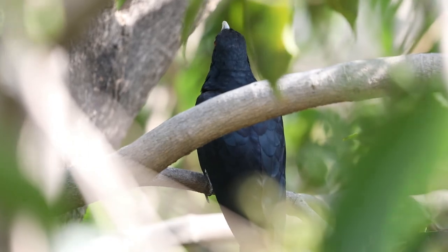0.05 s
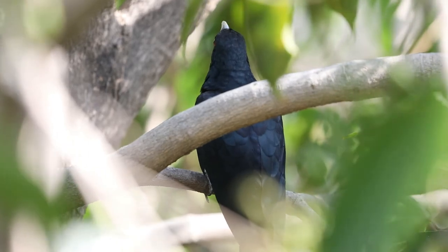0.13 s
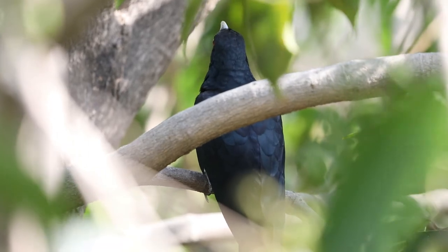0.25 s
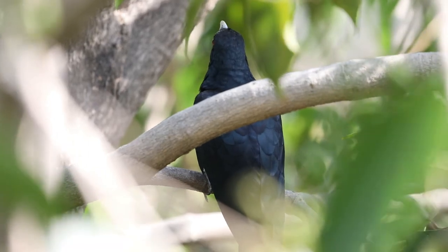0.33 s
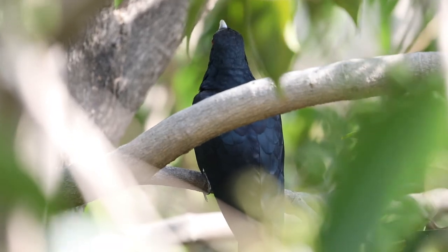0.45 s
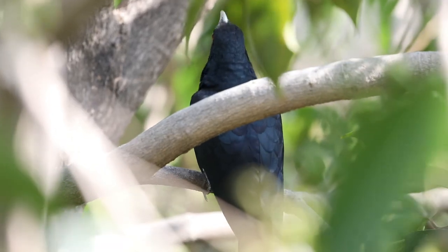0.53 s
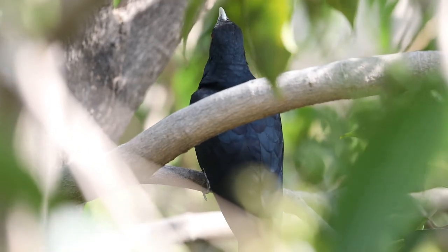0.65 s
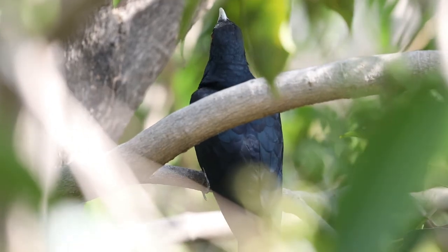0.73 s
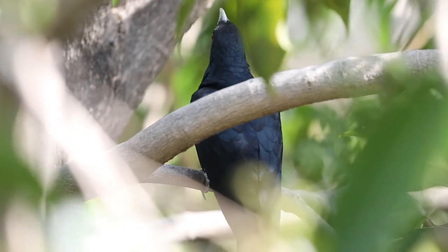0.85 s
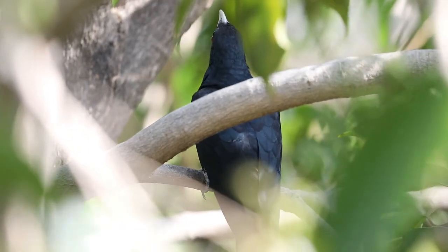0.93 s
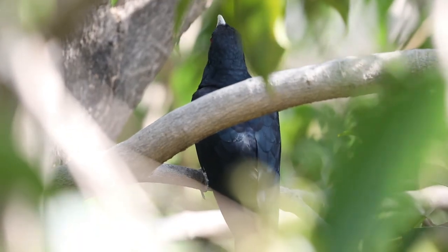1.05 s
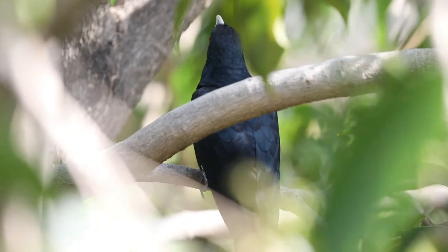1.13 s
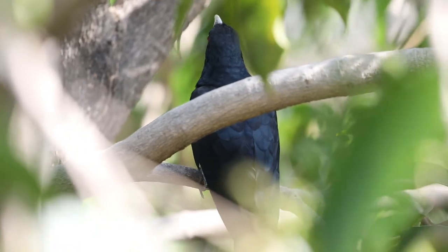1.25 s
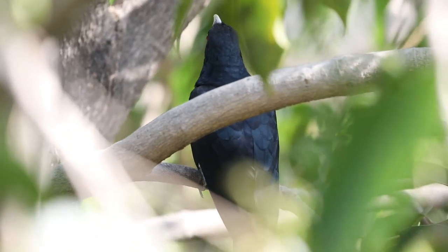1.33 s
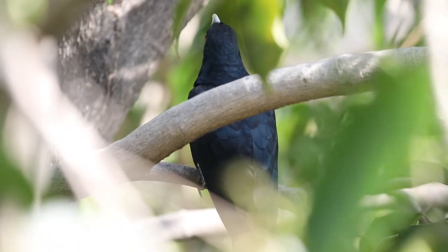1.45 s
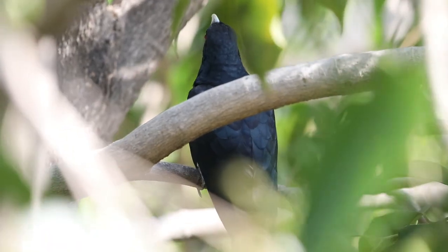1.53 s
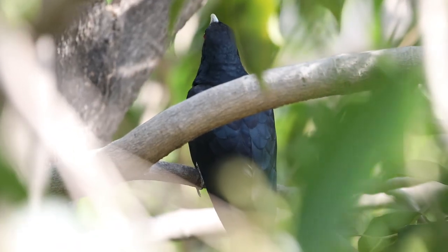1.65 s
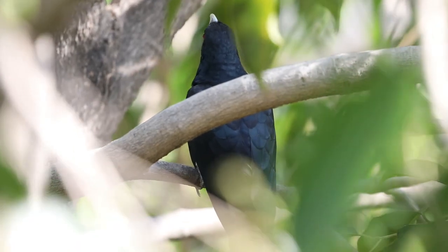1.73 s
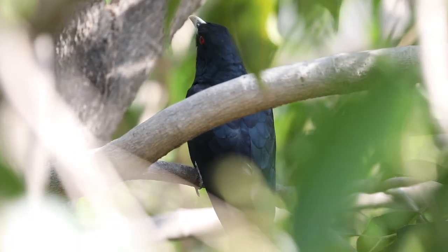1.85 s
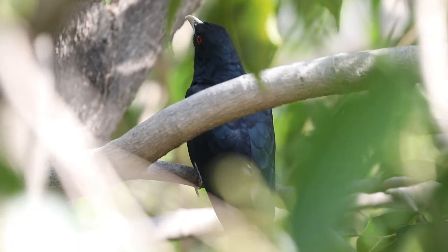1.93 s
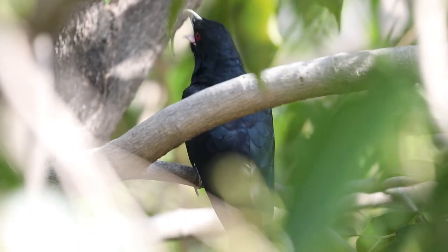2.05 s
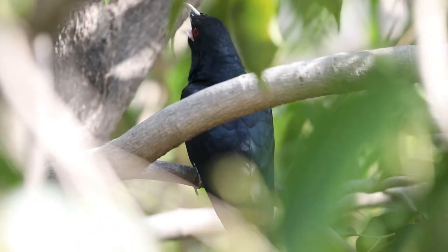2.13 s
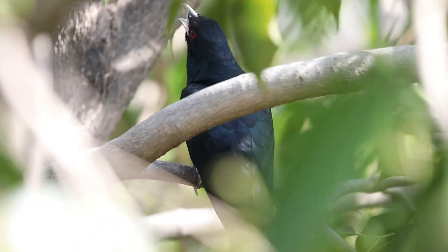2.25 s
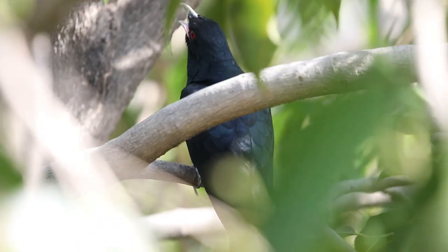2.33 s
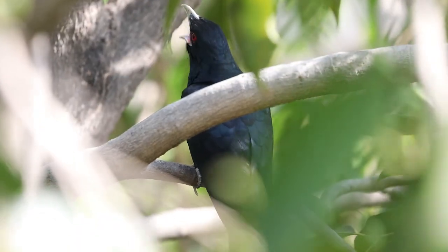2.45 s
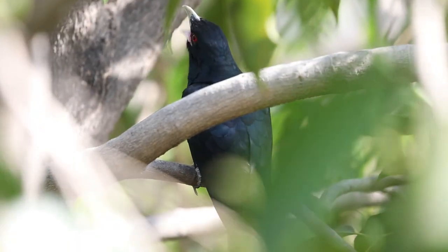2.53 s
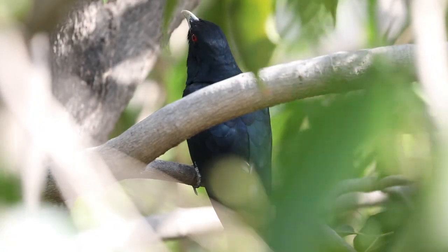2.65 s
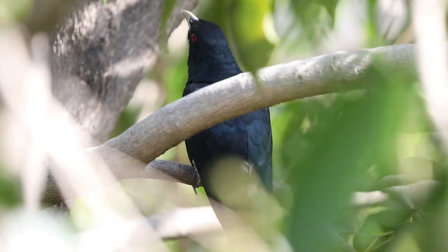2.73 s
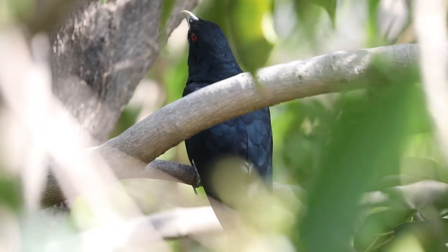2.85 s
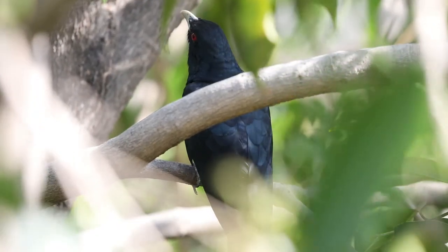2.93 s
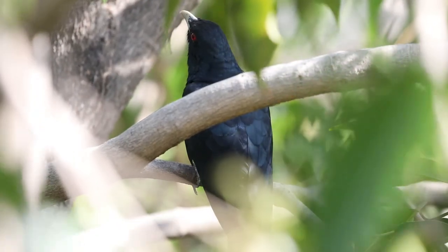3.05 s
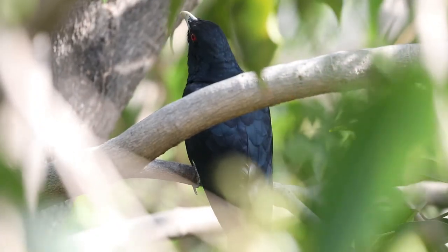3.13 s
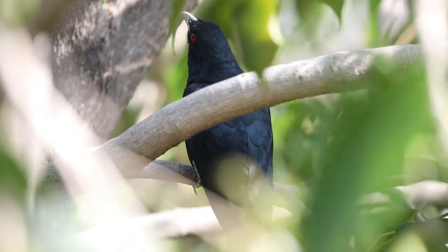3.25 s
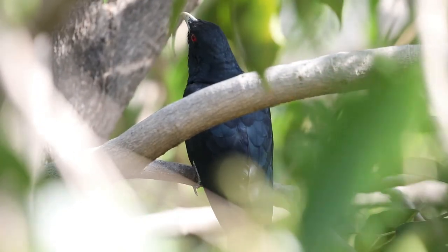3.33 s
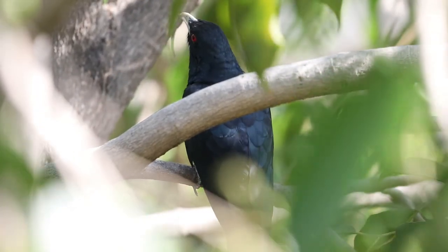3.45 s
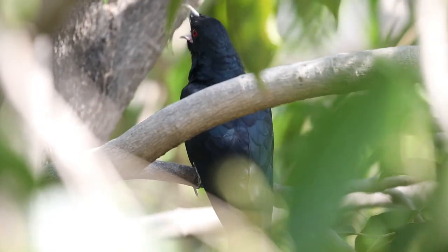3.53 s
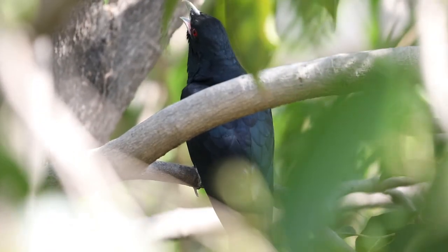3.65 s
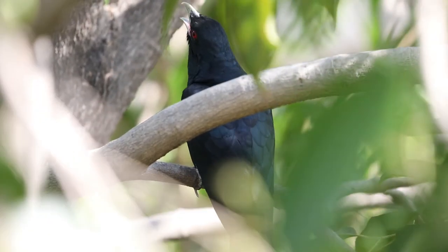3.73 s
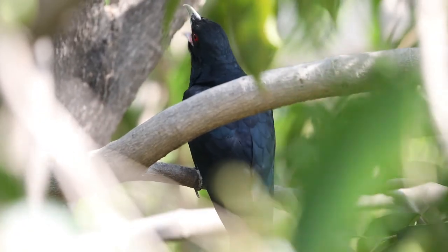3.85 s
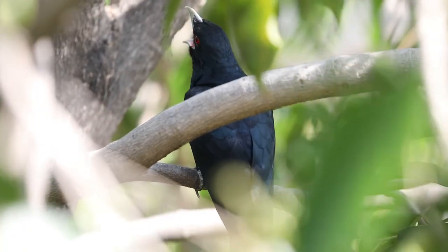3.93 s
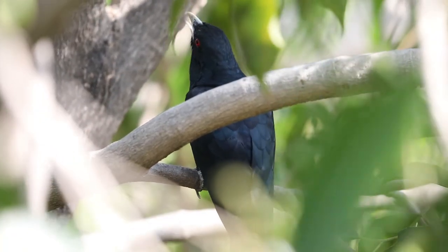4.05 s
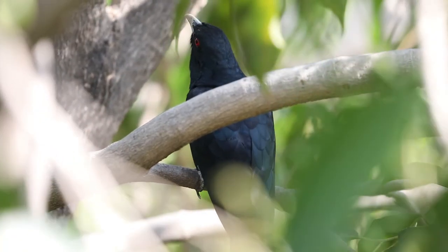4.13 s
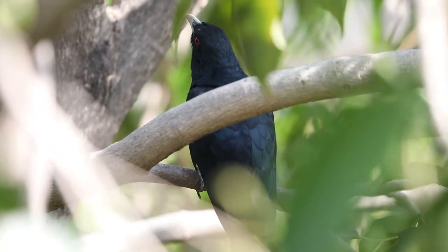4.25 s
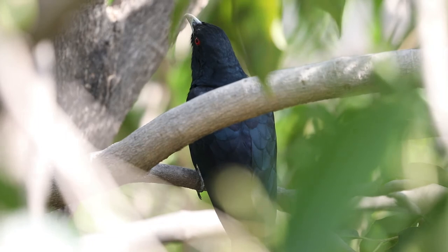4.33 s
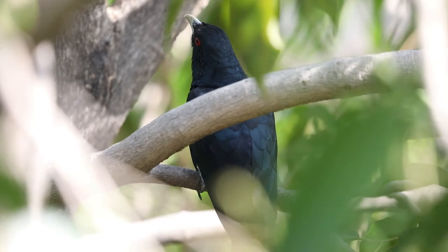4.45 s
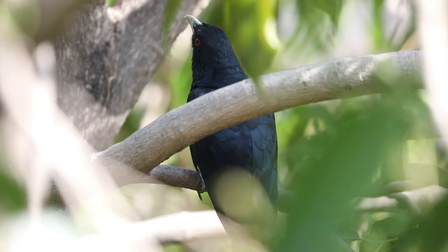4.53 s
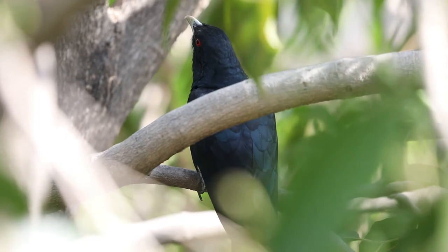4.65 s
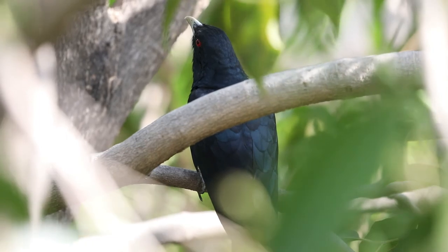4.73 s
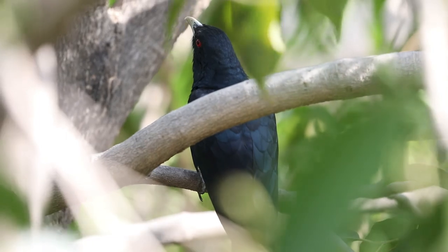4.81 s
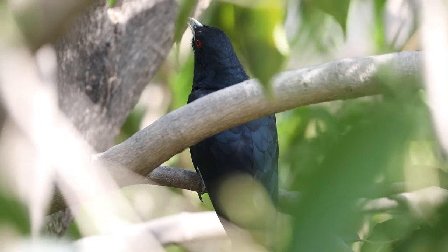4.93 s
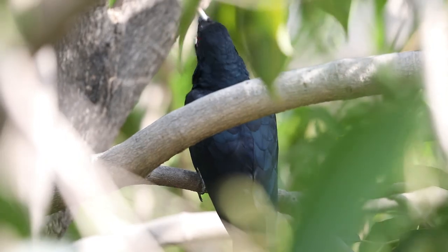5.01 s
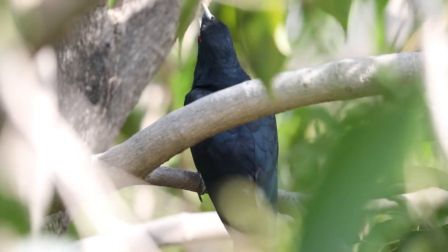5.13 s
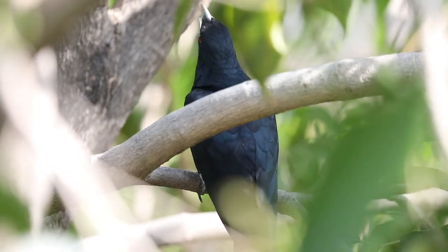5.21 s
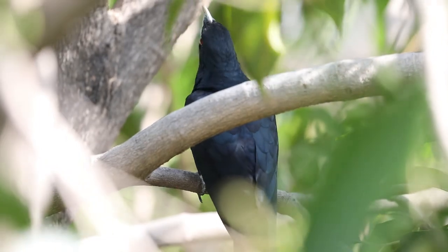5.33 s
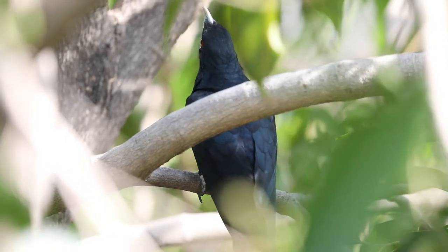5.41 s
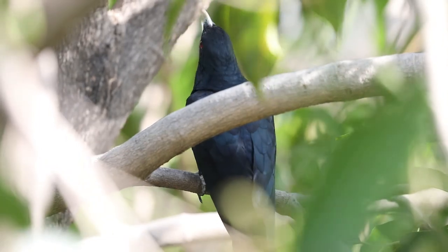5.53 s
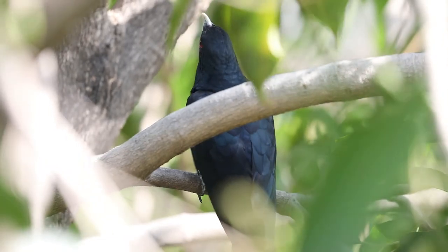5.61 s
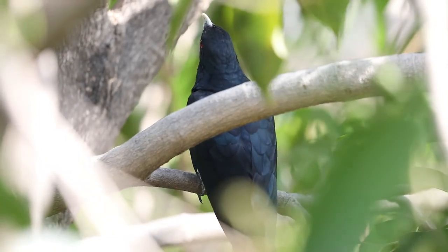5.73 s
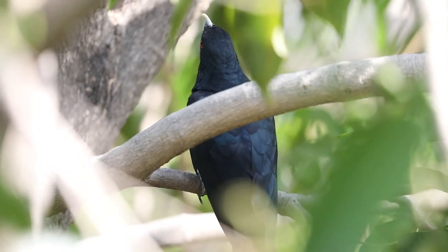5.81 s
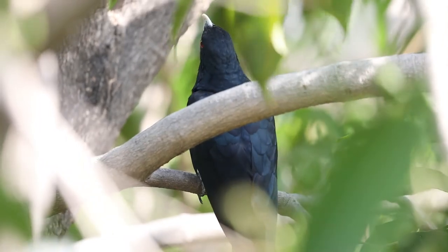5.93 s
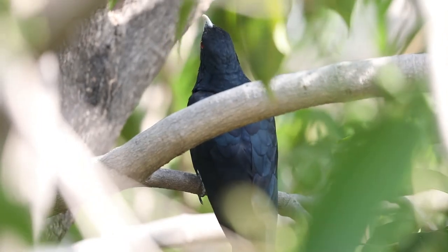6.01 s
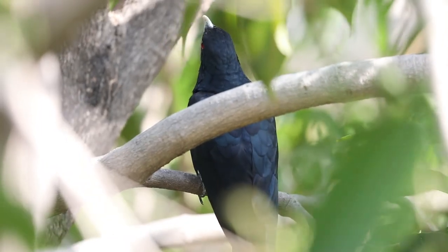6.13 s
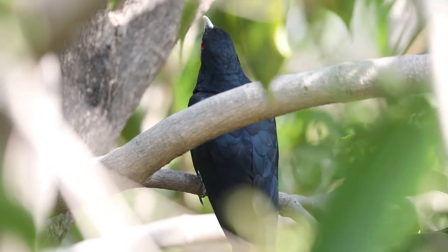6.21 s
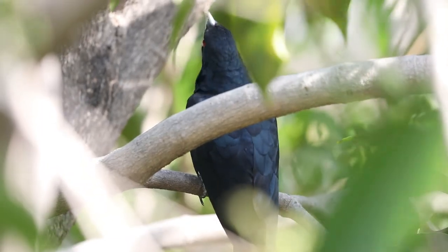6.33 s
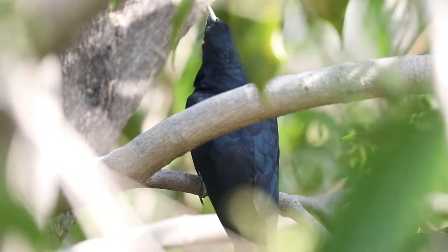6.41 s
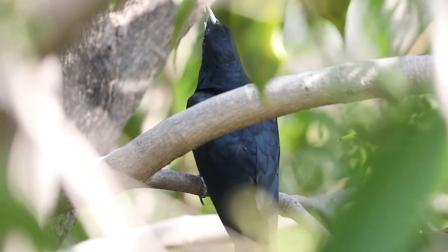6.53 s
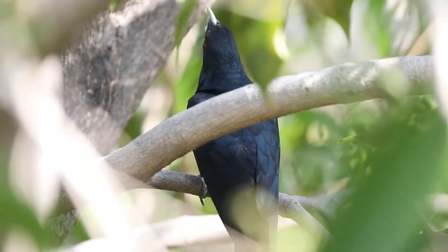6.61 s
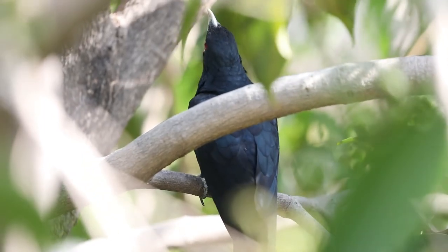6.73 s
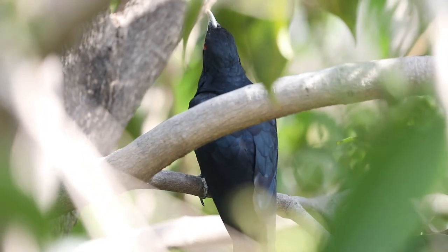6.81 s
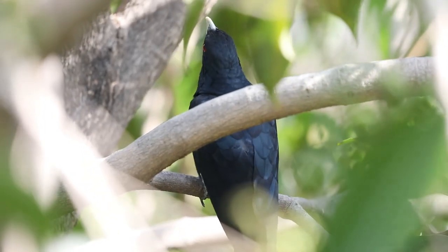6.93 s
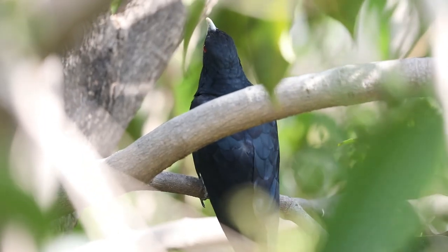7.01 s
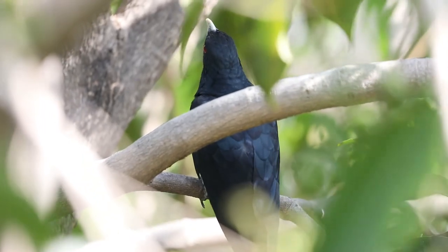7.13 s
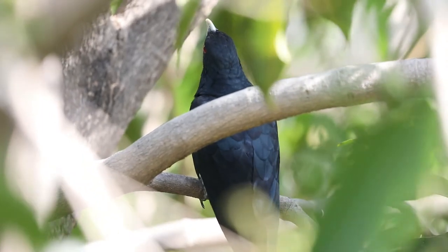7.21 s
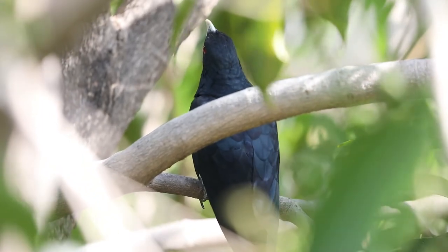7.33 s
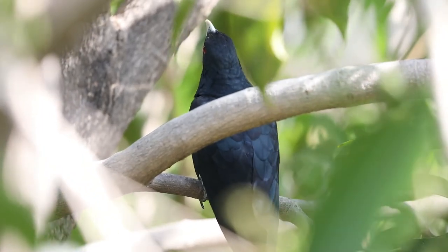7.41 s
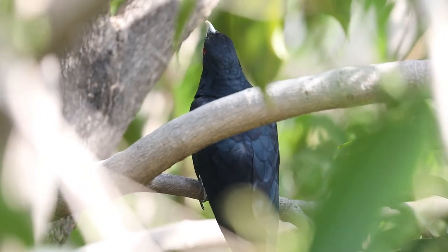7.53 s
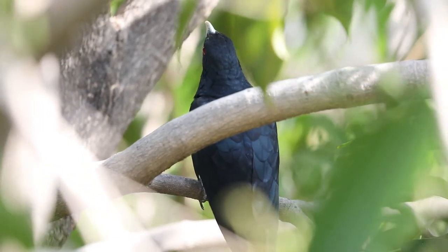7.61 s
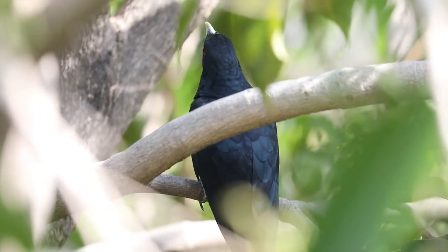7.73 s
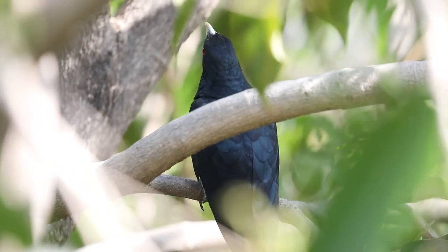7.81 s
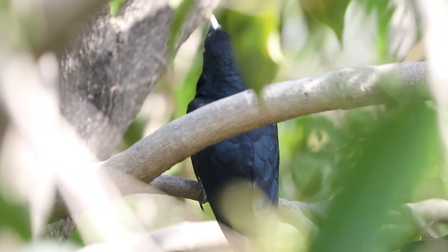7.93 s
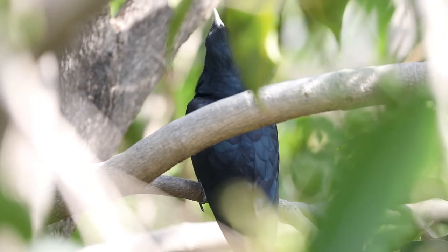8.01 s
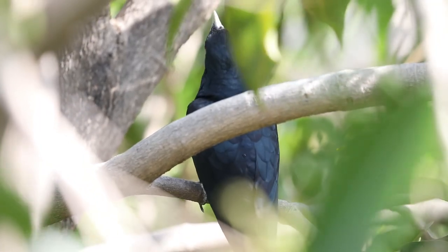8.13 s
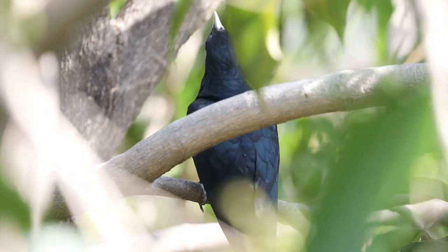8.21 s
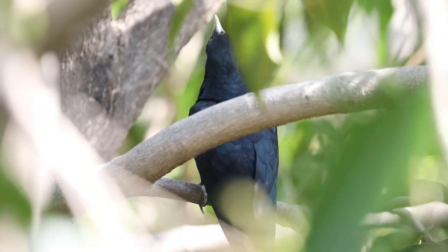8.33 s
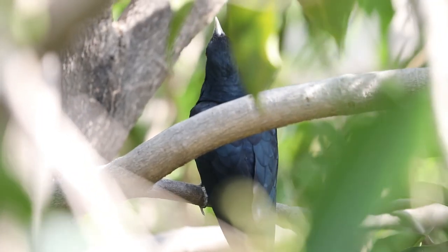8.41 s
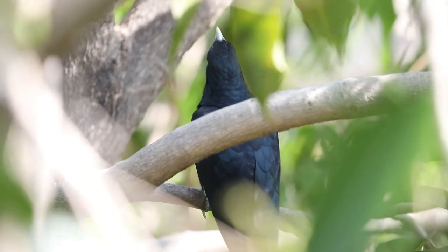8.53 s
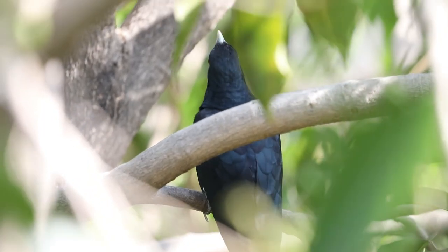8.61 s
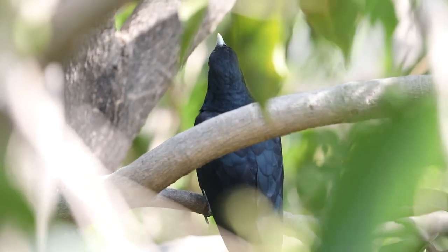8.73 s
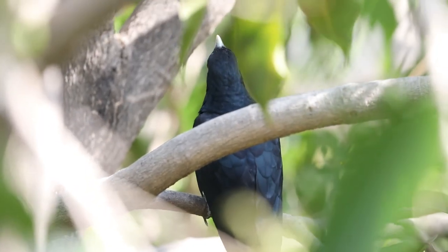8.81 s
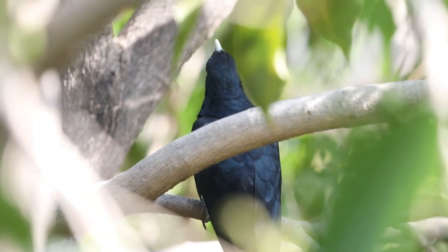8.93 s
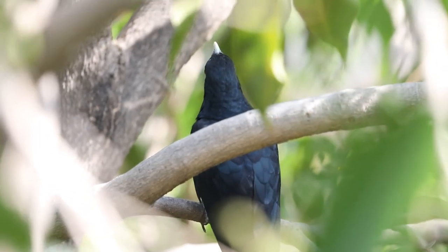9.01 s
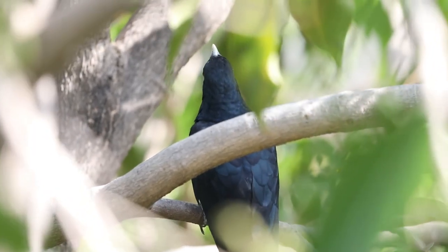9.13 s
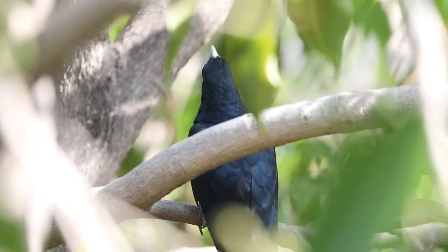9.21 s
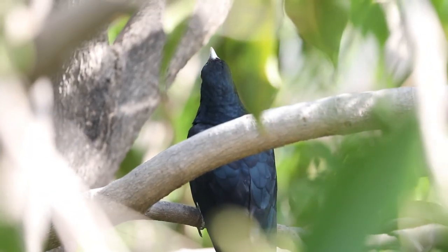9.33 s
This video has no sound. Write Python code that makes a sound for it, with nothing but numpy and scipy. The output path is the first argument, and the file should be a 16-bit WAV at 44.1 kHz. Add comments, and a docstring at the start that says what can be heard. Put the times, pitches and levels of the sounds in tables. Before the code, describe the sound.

A bird gives six loud rising whistles, several cracking into a rasp, while another chirps over soft distant traffic.

```python
"""Koel in a town garden

A koel in a tree gives six loud whistles that dip and rise; four crack into a rasp at the top,
where the syrinx doubles its period and turns chaotic. A second bird chirps in falling notes and
peeps, others call far off, a scooter horn's diaphragm buzzes once and a distant vehicle whines past.
Walls and trees echo the nearer sounds over soft traffic."""
import sys
import numpy as np
from scipy import signal
from scipy.fft import rfft, irfft, next_fast_len
from scipy.io import wavfile
from scipy.ndimage import uniform_filter1d

SR = 44100
rng = np.random.default_rng(int(sys.argv[2]) if len(sys.argv) > 2 else 0)


def put_to_file(sound):
    """Save the sound as 16-bit audio at rate SR, in the file named by the first command-line argument."""
    columns = np.atleast_2d(sound).T  # one column per channel
    safe = np.clip(columns, -1, 1)
    whole_steps = np.round(safe * 32767)
    wavfile.write(sys.argv[1], SR, whole_steps.astype(np.int16))


N = 412776
TIME = np.arange(N) / SR
CUTOFF_HZ = 15650
CRACK_LOSS_DB = 11   # koel's level drop in a full rasp

# second bird's voice colour: (frequency [Hz], gain [dB])
BIRD_COLOUR = [(1500, -21), (2400, -3.5), (3200, 1), (4100, 0), (5000, -6.5), (6000, -12), (7500, -8),
               (10000, -9.5), (12500, -23), (15000, -36)]


def from_db(db):
    """Decibels to gain."""
    return 10 ** (np.asarray(db) / 20)


def along(rows, t):
    """Table columns interpolated at t."""
    where, *columns = np.transpose(rows)
    return [np.interp(t, where, column) for column in columns]


def at_hz(points, hz, column=1):
    """Table column interpolated over log frequency."""
    points = np.array(points)
    return np.interp(np.log(hz + 1), np.log(points[:, 0]), points[:, column])


def ramp(x, centre, width):
    """Smooth step from 0 to 1."""
    return .5 + .5 * np.sin(np.pi * np.clip((x - centre) / width, -.5, .5))


def drift(rate_hz, size):
    """Unit Gaussian knots at rate_hz, joined by lines."""
    knots = rng.standard_normal(int(size / SR * rate_hz) + 3)
    return np.interp(np.arange(size) / SR * rate_hz, np.arange(len(knots)), knots)


def noise(colour, size=N):
    """Coloured noise, rms 1."""
    padded = next_fast_len(size)
    white = rfft(rng.standard_normal(padded))
    gain = from_db(at_hz(colour, np.fft.rfftfreq(padded, 1 / SR)))
    x = irfft(white * gain, padded)[:size]
    return x / np.sqrt(np.mean(x ** 2) + 1e-20)


def span(start_s, end_s):
    """Sample indices and a window with 1.3 ms fades."""
    at = np.arange(max(int(start_s * SR), 0), min(int(end_s * SR), N))
    return at, np.clip(np.minimum(TIME[at] - start_s, end_s - TIME[at]) / 0.0013, 0, 1)


def partials(pitch_hz, multiples, colour, flutter_db, flutter_hz):
    """Multiples of a moving pitch through a static colour, each with its own flutter."""
    phase = 2 * np.pi * np.cumsum(pitch_hz) / SR
    out = np.zeros(len(pitch_hz))
    for k in multiples:
        level_db = at_hz(colour, k * pitch_hz) + flutter_db * drift(flutter_hz, len(pitch_hz))
        in_band = k * pitch_hz < CUTOFF_HZ
        out += from_db(level_db) * in_band * np.sin(k * phase + rng.uniform(0, 2 * np.pi))
    return np.sqrt(2) * out


def town(rumble_gain_db=1.5, murmur_gain_db=6, hiss_db=-71, waver_db=0.86):
    """Rumble and murmur of distant traffic under a faint hiss."""
    # noise spectra: (frequency [Hz], relative density [dB])
    rumble = [(20, -37), (40, -30), (54, -14), (80, -22), (110, -12.5), (160, -1), (220, 1.5), (320, 1.5),
              (450, -1), (700, -13), (1200, -1), (2500, -68)]
    murmur = [(200, -59), (500, -3), (750, 0), (1050, 3), (1400, 2.5), (1900, 2.5), (2400, -4), (3000, -14),
              (4200, -31), (6000, -68), (10000, -69.5)]
    hiss = [(1000, -56), (3000, 4), (4000, -1.5), (5200, -5), (6400, -3), (7400, 2.5), (8600, -7.5),
            (11500, -8), (13000, -24), (15500, -38)]
    # traffic swells: (time [s], level before gain [dB])
    rumble_levels = [(0.0, -68.5), (0.55, -70), (4.12, -66), (5.6, -67), (7.04, -64.5), (9.36, -68)]
    murmur_levels = [(0.0, -68.5), (1.54, -62.5), (1.95, -65), (3.78, -61), (6.7, -63), (7.72, -61.5),
                     (9.36, -65)]
    rumble_db, = along(rumble_levels, TIME)
    murmur_db, = along(murmur_levels, TIME)
    layers = (rumble, rumble_db + rumble_gain_db), (murmur, murmur_db + murmur_gain_db), (hiss, hiss_db)
    return sum(noise(colour) * from_db(db + waver_db * drift(7, N)) for colour, db in layers)


def foliage():
    """Faint treble swishes in the leaves."""
    # swishes: (start [s], length [s], level [dB])
    swishes = [(1.74, .24, -75), (4.78, .28, -71.5)]
    # swish spectrum: (frequency [Hz], relative density [dB])
    colour = [(3000, -40), (6000, -14), (8000, -5), (11000, -1), (13000, -8), (15500, -22)]
    swell = np.zeros(N)
    for start_s, length_s, level_db in swishes:
        at, _ = span(start_s, start_s + length_s)
        swell[at] += from_db(level_db) * signal.windows.tukey(len(at))
    return swell * noise(colour)


def vehicle_whine(waver=0.00807, flutter_db=4.0, gain_db=-2):
    """A far drive whine sinks in pitch and flutters on its way through the trees."""
    # pass-by: (time [s], pitch [Hz], level before gain [dB])
    track = [(5.8, 1262, -71), (6.4, 1255, -72), (7.3, 1245, -59), (7.9, 1218, -55), (8.4, 1200, -50.5),
             (8.75, 1180, -58.5), (8.95, 1145, -58), (9.36, 1128, -63.5)]
    pitch_hz, level_db = along(track, TIME)
    phase = 2 * np.pi * np.cumsum(pitch_hz * (1 + waver * drift(60, N))) / SR
    return np.sin(phase) * from_db(level_db + gain_db + flutter_db * drift(18, N))


def far_birds(gain_db=-1):
    """Harsh calls, blurred by distance into swells of noise."""
    # calls: (start [s], length [s], level before gain [dB])
    calls = [(0.164, 0.34, -55.5), (1.43, 0.24, -56), (1.941, 0.32, -55.5), (3.02, 0.27, -52.5),
             (3.58, 0.25, -53.5), (4.312, 0.27, -59), (7.24, 0.38, -54.5), (7.855, 0.51, -57)]
    # call spectrum: (frequency [Hz], relative density [dB])
    colour = [(400, -62), (1200, -11), (1600, -5.5), (1950, 1), (2300, -14.5), (3000, -34), (6000, -84)]
    swell = np.zeros(N)
    for start_s, length_s, level_db in calls:
        at, _ = span(start_s, start_s + length_s)
        swell[at] += from_db(level_db + gain_db) * signal.windows.tukey(len(at), .7)
    return swell * noise(colour)


def horn(start_s=3.314, length_s=0.24, buzz_hz=401.4, gain_db=-49, attack_s=0.007, release_db_per_s=1102):
    """One scooter beep: a rattling diaphragm whose disc rings near 3 kHz."""
    # horn resonances: (frequency [Hz], gain [dB])
    colour = [(402, -14.5), (800, -31), (2000, -44), (2410, -18), (2820, -9.5), (3220, -15), (3620, -4),
              (4020, -17.5), (4500, -41), (8500, -39), (10000, -24), (11600, -28.5), (13000, -44),
              (14000, -54)]
    at, fade = span(start_s, start_s + 2 * length_s)
    t = TIME[at] - start_s
    level_db = gain_db - release_db_per_s * np.maximum(t - length_s, 0)
    pitch_hz = buzz_hz * (1 + .005 * drift(600, len(at)) + .0025 * drift(14, len(at)))
    buzz = partials(pitch_hz, range(1, 34), colour, flutter_db=7, flutter_hz=103)
    out = np.zeros(N)
    out[at] = fade * np.minimum(t / attack_s, 1) * from_db(level_db) * buzz
    return out


def peeps(jitter=.035):
    """Second bird: short, slightly rough notes at a level pitch."""
    # peeps: (start [s], length [s], pitch [Hz], gain [dB])
    notes = [(2.189, 0.079, 3270, -56), (4.641, 0.068, 3190, -56.5), (4.738, 0.082, 3130, -62.5)]
    out = np.zeros(N)
    for start_s, length_s, centre_hz, gain_db in notes:
        at, _ = span(start_s, start_s + length_s)
        pitch_hz = centre_hz * (1 + jitter * drift(600, len(at)))
        voice = partials(pitch_hz, range(1, 5), BIRD_COLOUR, flutter_db=0.5, flutter_hz=118)
        out[at] += signal.windows.tukey(len(at)) * from_db(gain_db) * voice
    return out


def chirps(jitter=0.0094, wobble=.015, gain_db=-3.5, clear_above_db=-51.5, shading=0.81, hoarse_db=-8):
    """Second bird: hoarse notes flick up and slide down. Returns the whole song and its direct part."""
    # chirps: (start [s], length [s], top pitch [Hz], level before gain [dB])
    notes = [(-.07, .13, 2345, -53.5), (0.117, 0.16, 2400, -50), (0.395, .15, 2403, -50.5),
             (0.67, 0.13, 2490, -50.5), (1.23, 0.15, 2560, -49.5), (1.576, .13, 2481, -50),
             (2.214, 0.12, 2384, -52.5), (2.735, 0.13, 2390, -54.5), (3.011, 0.15, 2440, -54.5),
             (3.653, 0.16, 2440, -54), (4.673, 0.11, 2364, -54), (5.087, 0.16, 2360, -54.5),
             (5.788, 0.15, 2442, -54), (7.015, 0.1, 2490, -50.5), (7.248, .128, 2291, -51),
             (7.495, 0.14, 2316, -51.5), (7.767, 0.14, 2237, -52), (7.938, 0.14, 2180, -53.5),
             (8.02, 0.15, 2380, -51), (8.291, 0.12, 2270, -51), (9.202, 0.15, 2580, -52.5)]
    # one chirp: (time [share of length], pitch [share of top], relative level [dB])
    shape = [(0, 0.68, -13), (.09, 0.98, -1.5), (.24, 1.01, -1), (.43, 0.87, -0.5), (.6, .79, -0.5),
             (.85, .66, -4.5), (1, .58, -8.5)]
    sung, direct = np.zeros((2, N))
    for start_s, length_s, top_hz, level_db in notes:
        at, fade = span(start_s, start_s + length_s)
        bend, swell_db = along(shape, (TIME[at] - start_s) / length_s)
        bend += wobble * drift(44.7, len(at))
        pitch_hz = top_hz * uniform_filter1d(bend, size=400, mode="nearest")
        # faint notes are hoarser and more scattered by the foliage
        clarity = from_db(shading * min(level_db - clear_above_db, 0))
        pitch_hz *= 1 + jitter / clarity ** 2 * drift(701, len(at))
        voice = partials(pitch_hz, range(1, 9), BIRD_COLOUR, flutter_db=3, flutter_hz=149.8)
        hoarse = noise([(1000, -60)] + BIRD_COLOUR, len(at)) * from_db(hoarse_db) / clarity
        note = fade * from_db(level_db + swell_db + gain_db) * (voice * np.sqrt(clarity) + hoarse)
        sung[at] += note
        direct[at] += note * clarity
    return sung, direct


def koel_gesture(start_s, rise_s, dip_hz, top_hz, onset_hz, dip_db, top_db, harshness):
    """One call's controls: pitch flicks up, dips, arches and sags; a harsh call cracks near the top."""
    scoop_hz, scoop_s, settle_s, arch_s, sag_hz_per_s2 = 219.8, 0.00798, .049, .092, 10500
    attack_s, release_s, release_db_per_s = 0.02, .125, 248
    rasp_ceiling_hz, rasp_sink_db_per_s = 1589, 66
    strain_hz, strain_db_per_hz = 1740, .04
    hold_s = 0.086 if harshness > .5 else 0.051
    at, fade = span(start_s, start_s + rise_s + hold_s + release_s)
    t = TIME[at] - start_s
    past_top_s = np.maximum(t - rise_s, 0)
    onset = np.exp(-(t / settle_s) ** 2)
    arch = np.exp(-np.abs((t - rise_s) / arch_s) ** 1.87)
    strain = arch * from_db(strain_db_per_hz * (top_hz - strain_hz))
    rasp = harshness * ramp(t, centre=rise_s - .014, width=0.048)

    pitch_hz = dip_hz + onset_hz * onset + (top_hz - dip_hz) * arch - sag_hz_per_s2 * past_top_s ** 2
    pitch_hz -= rasp * np.maximum(pitch_hz - rasp_ceiling_hz, 0)   # a broken voice cannot hold the top
    pitch_hz -= scoop_hz * np.exp(-t / scoop_s)

    level_db = dip_db + (top_db - dip_db) * ramp(t, centre=0.22, width=0.15)
    level_db -= rasp * (CRACK_LOSS_DB + rasp_sink_db_per_s * past_top_s)
    level_db -= release_db_per_s * (1 + rasp) * np.maximum(past_top_s - hold_s, 0)
    envelope = fade * np.minimum(t / attack_s, 1) ** 2 * from_db(level_db)
    return at, envelope, np.maximum(pitch_hz, dip_hz / 2), strain, rasp, t > rise_s


def koel_whistle(pitch_hz, rasp, falling, press_db_per_octave=5, slack_hz=1480, slack_db_per_hz=0.0372):
    """A near-pure tone from the syrinx; higher notes are pressed harder and sound brighter."""
    # overtone colour: (frequency [Hz], relative gain [dB])
    colour = [(2600, -37.5), (3300, -40.5), (4400, -42.5), (5400, -33), (6100, -39), (6900, -28),
              (8200, -37), (9600, -33.5), (11000, -35.5), (12500, -41), (14000, -48), (15600, -62)]
    phase = 2 * np.pi * np.cumsum(pitch_hz) / SR
    fundamental = np.sqrt(2) * np.sin(phase) * (1 - rasp)
    overtones = partials(pitch_hz, range(2, 12), colour, flutter_db=5, flutter_hz=89.8)
    overtones *= from_db(press_db_per_octave * np.log2(pitch_hz / 1400))
    # as the note falls slack, overtones outlast the fundamental
    overtones *= from_db(slack_db_per_hz * np.maximum(slack_hz - pitch_hz, 0) * falling * (1 - rasp))
    # on low notes the loose syrinx adds lines between the harmonics
    looseness = 1 - ramp(pitch_hz, centre=1320, width=60)
    half_lines = partials(pitch_hz, np.arange(1, 10) + .5, colour, flutter_db=5, flutter_hz=60)
    return fundamental + overtones + looseness * from_db(-2) * half_lines


def koel_hoarseness(strain, rasp, gain_db=-26, flutter_db=3):
    """Noise of the strained voice near the top; it carries on through the crack."""
    # hoarse spectrum: (frequency [Hz], relative density [dB])
    colour = [(1500, -34), (3000, -6), (5500, -8.5), (7200, 0), (10500, 3), (12500, -1), (15500, -17)]
    level_db = gain_db + CRACK_LOSS_DB * rasp + flutter_db * drift(350, len(rasp))
    return strain * noise(colour, len(rasp)) * from_db(level_db)


def koel_crack(pitch_hz, rasp, doubling_db=-1, chaos_db=-4, rattle_db=3.5):
    """Pushed too hard, the syrinx doubles its period and turns chaotic."""
    # rasp colour: (frequency [Hz], relative gain [dB])
    colour = [(300, -99), (1000, -17), (1300, -19), (1700, 5.5), (2050, -2), (2350, -2), (2700, -9.5),
              (3100, -15), (6000, -22), (10500, -16.5), (13000, -36), (15500, -46)]
    doubling = partials(pitch_hz, [1.5], colour, flutter_db=1, flutter_hz=250) * from_db(doubling_db)
    chaos = noise(colour, len(rasp)) * from_db(chaos_db + rattle_db * drift(350, len(rasp)))
    return rasp ** 2 * doubling + rasp * chaos


def koel(gain_db=0.17, min_rasp=0.028):
    """Six two-note calls; strain and rasp make the pitch jitter."""
    # calls before crack and gain: (start [s], time to top [s], dip pitch [Hz], top pitch [Hz],
    # onset above dip [Hz], dip level [dB], top level [dB], harshness [0-1])
    calls = [(.655, 0.33, 1270, 1554, 152.5, -34.5, -29, 0.03),
             (2.228, 0.32, 1309, 1590, 165, -32, -28, 0.68),
             (3.685, 0.32, 1313, 1669, 157.5, -32, -27.5, 0),
             (5.168, 0.32, 1334, 1704, 163, -31.5, -26.5, 0.91),
             (6.50, .323, 1358, 1748, 228, -30, -25.5, 0.88),
             (8.085, .324, 1357, 1772, 169, -30.5, -26, .9)]
    out = np.zeros(N)
    for call in calls:
        at, envelope, pitch_hz, strain, rasp, falling = koel_gesture(*call)
        rasp = np.maximum(rasp, min_rasp)
        jitter = 0.00063 + 0.0017 * strain + 0.03 * rasp
        pitch_hz *= 1 + jitter * drift(900, len(at))
        whistle = koel_whistle(pitch_hz, rasp, falling)
        out[at] += envelope * (whistle + koel_hoarseness(strain, rasp) + koel_crack(pitch_hz, rasp))
    return from_db(gain_db) * out


def with_echoes(x):
    """Direct sound plus near reflections; a gliding note beats against its own echoes."""
    # branches, ground and walls: (delay [s], gain [dB])
    reflections = [(.002768, -9.5), (.013197, -20), (.015885, -11.5), (.01928, -15), (.022165, -16.5),
                   (.04407, -21), (.105, -21)]
    out = x.copy()
    for delay_s, gain_db in reflections:
        out += from_db(gain_db) * np.interp(TIME - delay_s, TIME, x, left=0)
    return out


def garden_tail(x, length_s=1.3, build_s=0.015):
    """Leaves and far walls scatter a diffuse tail, in ten bands."""
    # reverberation: (frequency [Hz], t60 [s], gain [dB])
    reverb = [(400, 0.83, -6.5), (1452, 1, -9), (2400, 0.57, -5.5), (3939, 0.84, -5.5), (6960, 0.36, -6),
              (14200, 0.83, -14)]
    t = TIME[:int(length_s * SR)]
    response = np.zeros(len(t))
    edges_hz = np.geomspace(200, CUTOFF_HZ, 11)
    for low_hz, high_hz in zip(edges_hz, edges_hz[1:]):
        centre_hz = np.sqrt(low_hz * high_hz)
        decay = from_db(-60 * t / at_hz(reverb, centre_hz)) * (1 - np.exp(-t / build_s))
        scatter = rng.standard_normal(len(t)) * decay / np.linalg.norm(decay)
        band = signal.butter(2, [low_hz, high_hz], "band", fs=SR, output="sos")
        response += from_db(at_hz(reverb, centre_hz, column=2)) * signal.sosfilt(band, scatter)
    return signal.fftconvolve(x, response)[:N]


def scene(farther_send_db=3):
    """Mono mix: koel near, second bird and horn farther off and wetter, background beneath."""
    near = koel()
    farther = peeps() + horn()
    chirps_sung, chirps_direct = chirps()
    tail = garden_tail(near + from_db(farther_send_db) * (farther + chirps_sung))
    background = far_birds() + foliage() + vehicle_whine() + town()
    return (with_echoes(near) + farther + chirps_direct + tail + background)[None]


def record(dry):
    """Steep low-pass."""
    return signal.sosfilt(signal.ellip(10, .1, 70, CUTOFF_HZ, fs=SR, output="sos"), dry)


dry = scene()
out = record(dry)
put_to_file(out)
```